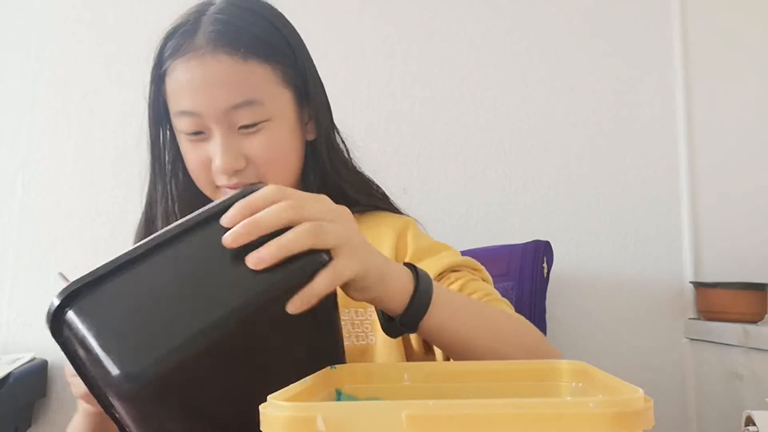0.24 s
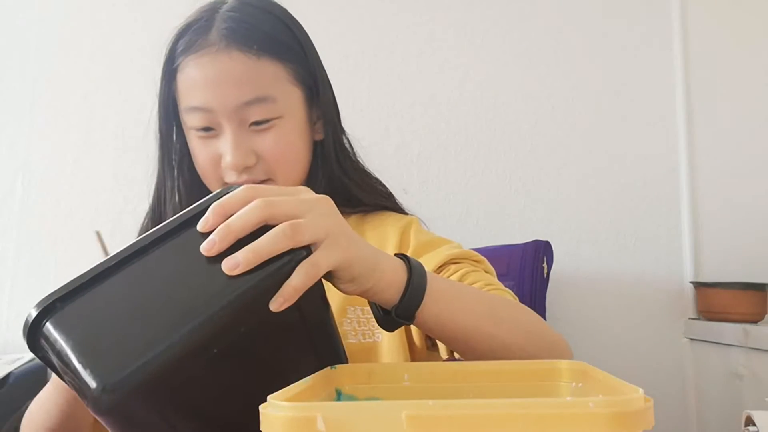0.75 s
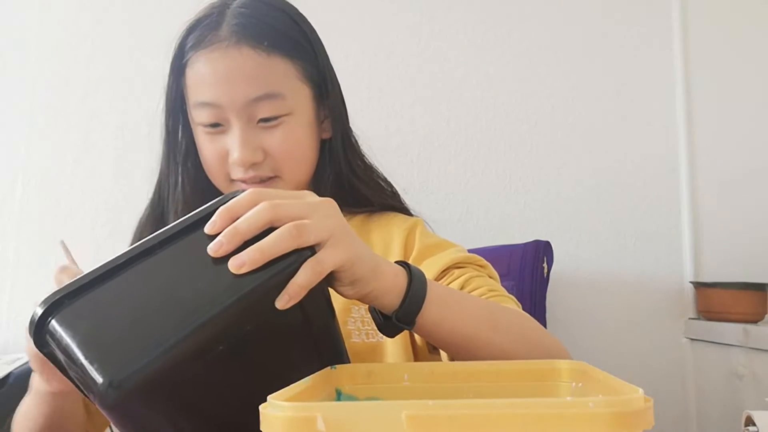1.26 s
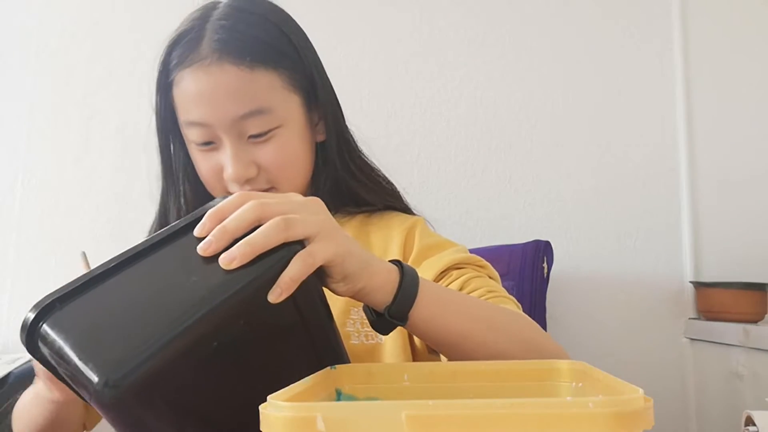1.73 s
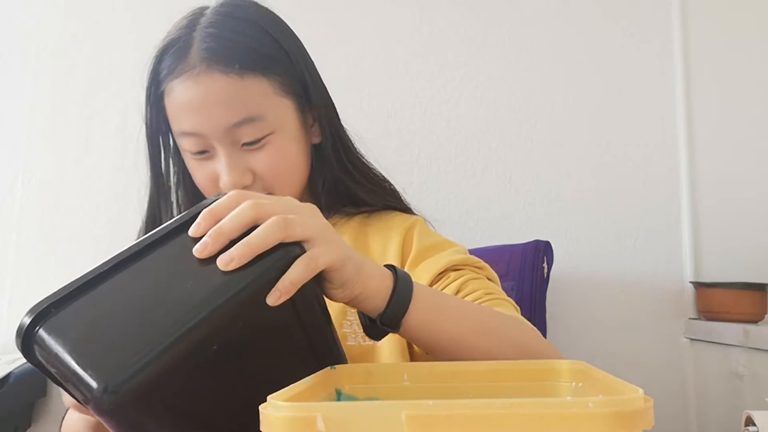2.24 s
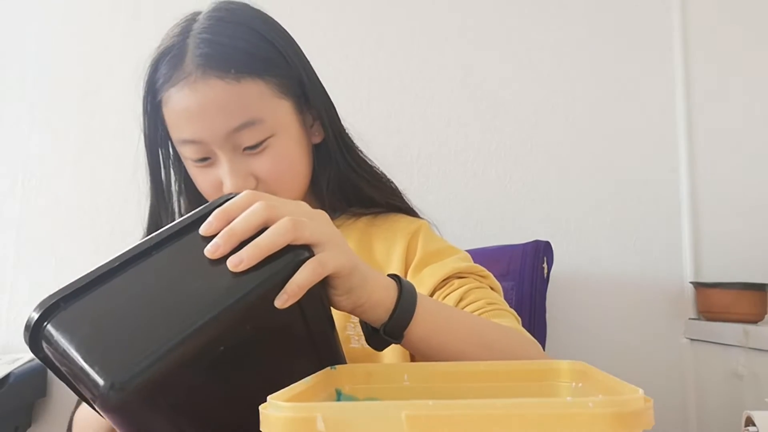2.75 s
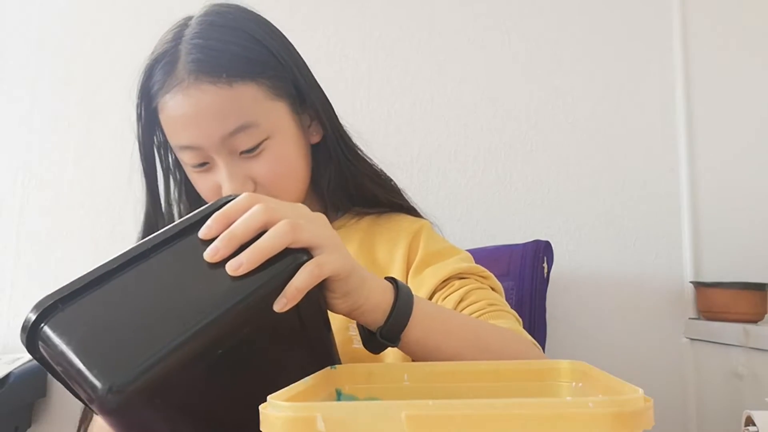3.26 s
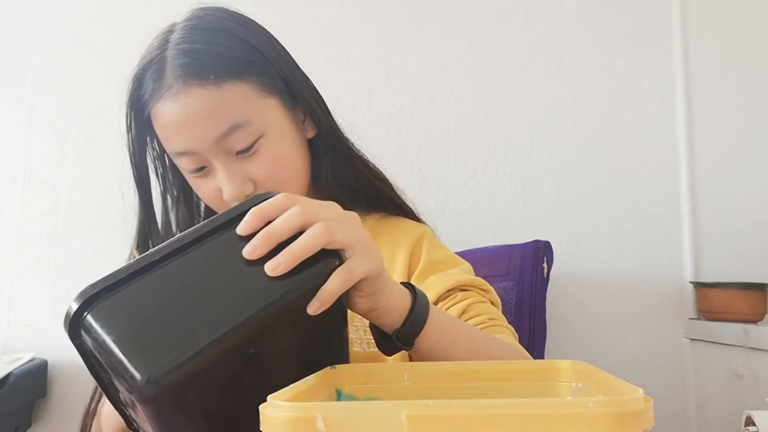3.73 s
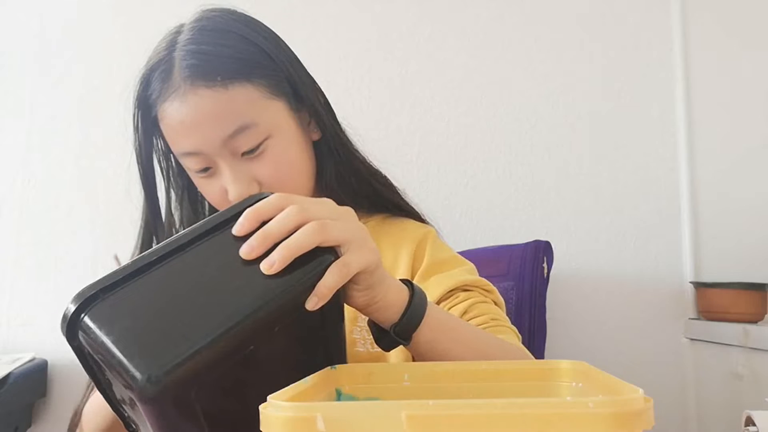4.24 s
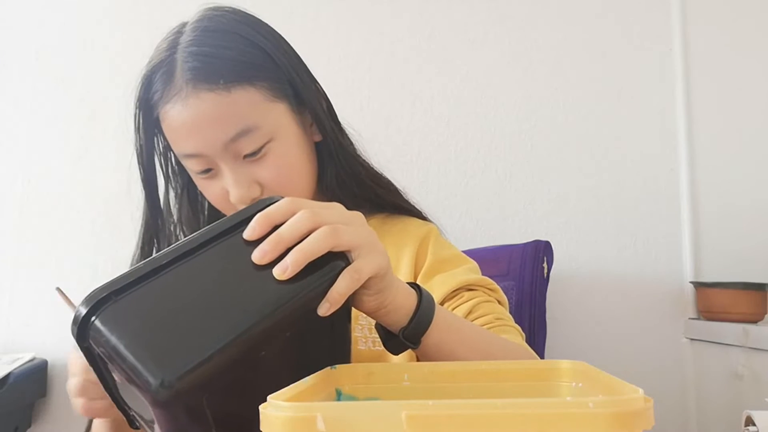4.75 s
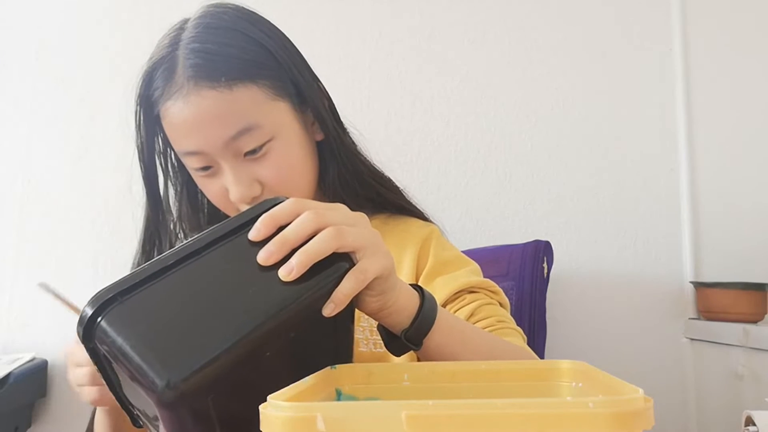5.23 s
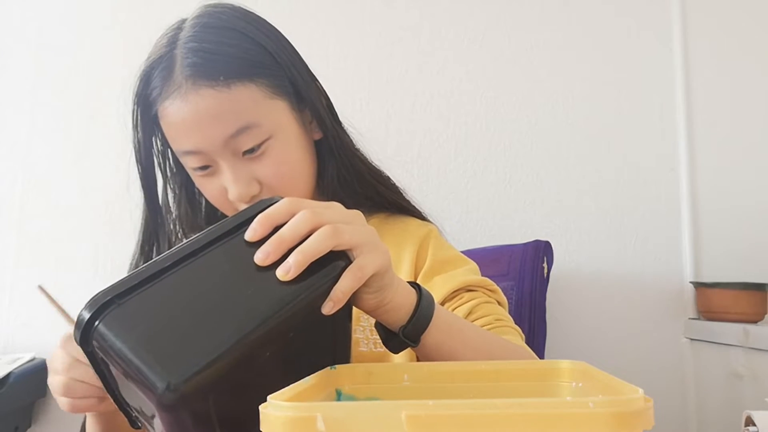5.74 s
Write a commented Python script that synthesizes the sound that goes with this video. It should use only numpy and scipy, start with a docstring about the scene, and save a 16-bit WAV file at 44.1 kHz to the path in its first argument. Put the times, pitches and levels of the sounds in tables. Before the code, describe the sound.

Dull, hollow stick taps on a tilted plastic container over a faint low hum, pausing midway, then returning as brisk, brighter, steady knocks.

```python
"""A low motor hum under faint hiss comes first, then a brush of cloth, then chopsticks working a thick mixture in a tub.
They knock the tilted plastic tub about three times a second, later faster and harder. Each knock sums fading tones
and noise set by its force, its hardness and where it lands; a small bare room answers with shaped, fading noise.
Between knocks come light grazes, a thin squeak made from a wavering sine, and sticky ticks made from noise bursts.
A phone close by picks it all up on two microphones."""
import sys
import numpy as np
from scipy import signal
from scipy.fft import rfft, irfft, next_fast_len
from scipy.io import wavfile
from scipy.ndimage import map_coordinates

SR = 44100
rng = np.random.default_rng(int(sys.argv[2]) if len(sys.argv) > 2 else 0)


def persist_wave(psi):
    """Save psi, clipped to +-1, as 16-bit WAV."""
    counts = np.round(np.clip(psi, -1, 1) * 32767).astype(np.int16)
    wavfile.write(sys.argv[1], SR, np.atleast_2d(counts).T)


N = 264203  # length in samples, about 6 s


def amp(db):
    """Turn decibels into a gain."""
    return 10 ** (np.asarray(db) / 20)


def unit(x):
    """Scale a sound to rms 1."""
    return x / np.sqrt(np.mean(x ** 2) + 1e-20)


def along(points, hz):
    """Read a curve of (pitch_hz, value) points at any frequency, on a log axis."""
    f, v = np.transpose(points)
    return np.interp(np.log(hz + 1), np.log(f + 1), v)


def wobble(rate):
    """A smooth random curve with `rate` random points a second."""
    points = rng.standard_normal(int(N * rate / SR) + 4)
    return map_coordinates(points, [np.arange(N) * rate / SR])


def filtered(x, response):
    """Change the tone of x with a gain for each frequency."""
    n = x.shape[-1]
    padded = next_fast_len(n + SR // 10)
    gain = response(np.fft.rfftfreq(padded, 1 / SR))
    return irfft(rfft(x, padded) * gain, padded)[..., :n]


def noise(spectrum, size):
    """Two unrelated coloured noises, together of rms 1."""
    white = rng.standard_normal((2, size))
    return unit(filtered(white, lambda hz: amp(along(spectrum, hz))))


def add(track, s, sound):
    """Mix a sound into the track at s seconds."""
    start = max(round(s * SR), 0)
    part = track[:, start:][:, :sound.shape[1]]
    part += sound[:, :part.shape[1]]


# how alike the two microphones hear sound from all around: pitch_hz, likeness (1 = the same, 0 = unrelated)
LIKENESS = [(50, 1), (200, 0.92), (500, 0.057), (1500, 0.12), (8000, 0.016)]


def diffuse(pair):
    """Sound from all around: long bass waves reach both microphones alike, shorter waves do not."""
    def mid_and_side(hz):
        turn = np.arccos(np.clip(along(LIKENESS, hz), -1, 1)) / 2
        return np.array([np.cos(turn), np.sin(turn)])
    mid, side = filtered(pair, mid_and_side)
    return np.array([mid + side, mid - side])


# colour of the room air, before its overall level is set: pitch_hz, relative_level_db
AIR_COLOUR = [(20, -20.5), (44, -17), (58, -18), (78, -23), (110, -26.5), (195, -24.5), (290, -35.5),
              (520, -39), (850, -44), (1300, -44), (1900, -38.5), (4000, -49.5), (5600, -50.5), (9000, -56),
              (15500, -59)]
# faint electrical lines: pitch_hz (the pitch wavers around it), rms_level_db
WHINE_LINES = [(5443, -101), (9803, -101)]
HUM_HZ, HUM_DB, HUM_WAVER_DB = 48.5, -52, 0.9  # centre pitch, peak level and its unsteadiness
AIR_DB = -64  # rms


def background():
    """A motor's slightly unsteady drone, room air and a faint electrical whine."""
    hum_level = amp(HUM_DB + HUM_WAVER_DB * wobble(4.8))
    hum_phase = 2 * np.pi * np.cumsum(HUM_HZ + 0.5 * wobble(10)) / SR
    hum = hum_level * np.sin(hum_phase)
    air = amp(AIR_DB + 0.32 * wobble(15)) * unit(diffuse(noise(AIR_COLOUR, size=N)))
    whine = 0
    for hz, db in WHINE_LINES:
        phase = 2 * np.pi * np.cumsum(hz + 18 * wobble(120)) / SR
        whine = whine + amp(db) * np.sqrt(2) * np.sin(phase)
    return hum + air + whine


# the tub brushes against clothing as it is tilted: centre_s, length_s, level_db
BRUSH_STROKES = [(0.092, 0.049, -66), (0.124, 0.026, -64), (0.275, 0.085, -71.5)]
# colour of the rustling cloth, also used for grazes: pitch_hz, relative_level_db
CLOTH_COLOUR = [(150, -22), (400, 3), (800, -2.5), (1600, 1), (3000, -5.5), (5000, -10), (7500, -9),
                (15000, -33)]


def brushes():
    """Short grainy swells of cloth on plastic: noise whose level flickers fast."""
    t = np.arange(N) / SR
    swell = 0
    for s, length, db in BRUSH_STROKES:
        swell = swell + amp(db) * np.exp(-(2 * (t - s) / length) ** 2)
    grain = amp(3.7 * wobble(288.4))
    return swell * unit(noise(CLOTH_COLOUR, size=N) * grain)


BLOW_S = 0.023


def as_blow(x):
    """Scale a sound to rms 1 over the length of a blow."""
    return x / np.sqrt(np.mean(x[:, :round(BLOW_S * SR)] ** 2))


def sides(pan_db):
    """Left and right gains; pan_db is left minus right."""
    return amp([[pan_db / 2], [-pan_db / 2]])


def ring(modes, rise, stretch=1, detune=0.032, scatter_db=5.0):
    """Fading tones of the tub at both microphones; the contact point shifts them a little from blow to blow."""
    t = np.arange(SR // 2) / SR
    out = np.zeros((2, len(t)))
    for hz, db, t60, lag in modes:
        pitch = hz * stretch * (1 + detune * rng.normal())
        phase = 2 * np.pi * pitch * t
        fade = amp(db + scatter_db * rng.normal() - 60 * t / t60)
        onset = 1 - np.exp(-t / rise)
        out += fade * onset * np.array([np.sin(phase), np.sin(phase - lag)])
    return as_blow(out)


def crack(spectrum, t60):
    """A burst of noise that dies away at once, losing 60 dB in t60 seconds."""
    t = np.arange(SR // 2) / SR
    return noise(spectrum, size=len(t)) * amp(-60 * t / t60)


# low resonances, alike at both microphones: pitch_hz, relative_level_db, t60_s (time to fade by 60 dB)
BOOM_MODES = [(62.2, -4, 0.2), (91.8, -2, 0.1), (112.6, -2.5, 0.13)]


def boom(swell=0.016):
    """The low resonances swell up after the blow, then fade; scaled to peak 1."""
    t = np.arange(SR // 2) / SR
    low = 0
    for hz, db, t60 in BOOM_MODES:
        low = low + amp(db - 60 * t / t60) * np.sin(2 * np.pi * (hz * t + rng.random()))
    low = low * (1 - np.exp(-(t / swell) ** 2))
    return low / np.abs(low).max()


# how long the room's answer takes to fade by 60 dB: pitch_hz, t60_s
ROOM_FADE = [(100, 0.17), (300, 0.28), (700, 0.3), (2000, 0.29), (6000, 0.31), (14000, 0.53)]


def room_tail(colour_db, gap=0.0029, build=0.012):
    """Echoes of a short sound merge into fading noise of its colour, starting once the first wall is reached."""
    field = diffuse(rng.standard_normal((2, SR // 2)))
    hz, t, z = signal.stft(field, SR, nperseg=1024)
    fade_db = -60 * t / along(ROOM_FADE, hz)[:, None]
    tail = signal.istft(z * amp(colour_db(hz)[:, None] + fade_db), SR, nperseg=1024)[1]
    age = np.maximum(np.arange(SR // 2) / SR - gap, 0)
    return tail[:, :len(age)] * (1 - np.exp(-age / build))


# how boom, body, wall, rim, clack and tick (one row each) answer a knock, before the mix in knocks():
# level_at_medium_force_db, db_per_db_of_force, db_per_db_of_hardness, db_per_db_of_give
FAMILY_RESPONSE = [(-52.5, 0.94, 0.53, 1.54), (-48.5, 0.8344, -0.38, -0.33), (-48, 1.22, -0.43, 1.38),
                   (-50.5, 1.2851, -0.1, -0.11), (-55.5, 1.0449, 1.0353, -0.13), (-75.5, 0.57, 1.44, 0.49)]
MEDIUM_DB = -50  # medium force


def family_levels(force, hardness, give):
    """Levels in dB of the six families: a hard tip brightens a knock, a yielding panel deepens it."""
    medium, per_force, per_hardness, per_give = np.transpose(FAMILY_RESPONSE)
    return medium + per_force * (force - MEDIUM_DB) + per_hardness * hardness + per_give * give


# chopstick knocks: landing_s, force_db, hardness_db (bare tip + or cushioned by the mixture -),
# give_db (middle of a panel + or near a stiff edge -), wall_pitch_hz, rim_pitch_hz
STICK_KNOCKS = [(0.129, -65, -2, 7.5, 715, 1430), (0.688, -54, -7.5, -0.5, 707, 1350),
                (1.004, -49, -4, 0.5, 698, 1390), (1.378, -47.5, 2.5, -3.5, 646, 1505),
                (1.726, -46, 6, -2.5, 637, 1440), (2.132, -64.5, -2.5, 5.5, 712, 1420),
                (2.335, -51.5, -4.5, 0.5, 722, 1440), (2.543, -45, -1.5, 4, 737, 1475),
                (2.727, -48, -2, 4.5, 706, 1420), (3.104, -57, -7, -0.5, 840, 1400),
                (3.453, -50, -2.5, 4, 735, 1440), (4.38, -56, -2.5, 2, 683, 1210),
                (4.607, -62, -2.5, 7, 823, 1430), (4.636, -62, -1.5, 1.5, 716, 1140),
                (4.8373, -46, 0.5, -2.5, 597, 1290), (5.0527, -47.5, 0.8, 0, 587, 1326),
                (5.252, -41, 4.5, -3, 640, 1393), (5.441, -40.5, 6.3, -2, 696, 1390),
                (5.631, -41, 2, -3.5, 676, 1280), (5.832, -44, 1.7, -2.5, 640, 1380)]
# tones of the tub, from low to high, before each blow shifts them:
# pitch_hz, relative_level_db, t60_s (time to fade by 60 dB), right_microphone_lag_rad
BODY_MODES = [(199, -3.5, 0.052, 0.28), (233.9, -8, 0.096, 0.31), (336.7, 1.5, 0.03, 0.068),
              (501, -10, 0.039, 0.98)]
WALL_MODES = [(595, -4.5, 0.029, 0.8), (703, 9.5, 0.024, 2.6), (797, -11, 0.049, 1.2)]
RIM_MODES = [(1049, 1, 0.02, 0.3), (1206, -1, 0.015, 0), (1406, 17.5, 0.0099, 0.13)]
CLACK_MODES = [(1728, 11.5, 0.0056, 0.31), (1955, 4, 0.0047, 2.2), (2400, -1.5, 0.016, 1.61),
               (3010, -10.5, 0.0085, 2), (3370, -20, 0.031, 2)]
# colour of the contact noise: pitch_hz, relative_level_db
TICK_COLOUR = [(2000, -18), (3400, -32), (4700, 20.5), (6500, 25), (8500, 14), (12000, 4), (16000, -48)]
# colour of the room's answer to a blow: pitch_hz, relative_level_db
ROOM_COLOUR = [(60, 5), (105, 24), (150, 18.5), (235, 19.5), (450, 10), (640, 14.5), (950, 2.5),
               (1330, 13.5), (1600, 7.5), (2550, 10), (3900, 3), (6500, 2.5), (9000, -8), (15000, -15)]
# centres of boom, body, wall, rim, clack and tick: pitch_hz
FAMILY_CENTRES = [100, 270, 680, 1250, 2400, 6000]
PAN_DB = 6.5  # the tub lies to the left: left minus right for the edge sounds
CLACK_RISE_S, TICK_T60_S = 0.0006, 0.008


def knocks(boom_db=7, body_db=0, wall_db=-1, rim_db=-1, clack_db=-1, tick_db=-1.0, room_db=0,
           spread=0.4, sharpen=0.13, second_db=-12, skid_db=-29, echo_s=0.0145, echo_db=-16):
    """The stiff rim speaks at once; the wide panels, loaded by the shifting mixture, take milliseconds to swing."""
    track = np.zeros((2, N))
    for s, force, hardness, give, wall_hz, rim_hz in STICK_KNOCKS:
        levels = family_levels(force, hardness, give)
        low, body, wall, rim, clack, tick = levels
        # move the main wall and rim tones to this knock's pitches
        wall_stretch = wall_hz / WALL_MODES[1][0]
        rim_stretch = rim_hz / RIM_MODES[2][0]
        # the harder the contact, the higher the clack
        clack_stretch = amp(sharpen * max(clack - rim, 0))

        panels = amp(body + body_db) * ring(BODY_MODES, rise=0.0042) * sides(0.055 * PAN_DB)
        wall_ring = ring(WALL_MODES, rise=0.0026, stretch=wall_stretch)
        panels += amp(wall + wall_db) * wall_ring * sides(1.11 * PAN_DB)
        edge = amp(rim + rim_db) * ring(RIM_MODES, rise=0.00085, stretch=rim_stretch)
        edge += amp(clack + clack_db) * ring(CLACK_MODES, rise=CLACK_RISE_S, stretch=clack_stretch)
        edge += amp(tick + tick_db) * as_blow(crack(TICK_COLOUR, t60=TICK_T60_S))
        add(track, s, panels + edge * sides(PAN_DB) + amp(low + boom_db) * boom())

        # the tip skids over the plastic just before it lands
        add(track, s - rng.uniform(0.0017, 0.00404), amp(skid_db) * edge)
        # the second stick follows a moment after the first
        add(track, s + rng.uniform(0.002085, 0.00512), amp(second_db) * edge * sides(PAN_DB))
        # the nearest wall of the room sends back a copy
        add(track, s + echo_s, amp(echo_db) * (panels + edge))
        # the room gathers sound from all sides of the tub, so its colour varies less than that of the blow
        evened = (1 - spread) * levels + spread * np.mean(levels)
        colour = list(zip(FAMILY_CENTRES, evened))
        tail = room_tail(lambda hz: along(colour, hz) + along(ROOM_COLOUR, hz))
        add(track, s, amp(room_db) * tail)
    return track


# lightly damped tones that outlast the blow:
# pitch_hz, relative_level_db, t60_s (time to fade by 60 dB), right_microphone_lag_rad
LINGER_MODES = [(343, -12.5, 0.33, 0.42), (591, -5, 0.2, 1.3), (660, 3.5, 0.37, 3.06), (710, -10, .25, 4.3),
                (722, -8.5, 0.16, 2.7), (1304, -9, 0.2, 0.9), (1363, -5, 0.23, 0.14),
                (1440, -6, 0.17, 0.45), (1830, -7.5, 0.23, 0.9)]


def lingering(linger_db=-12.0):
    """With each knock the tub also sings on faintly, because some of its tones lose energy slowly."""
    track = np.zeros((2, N))
    for s, force, hardness, give, _, _ in STICK_KNOCKS:
        _, _, wall, rim, _, _ = family_levels(force, hardness, give)
        song = ring(LINGER_MODES, rise=0.0076, detune=0.0049)
        add(track, s, amp((wall + rim) / 2 + linger_db) * song)
    return track


# glancing touches that ring only the wall and the rim: start_s, wall_level_db, rim_level_db
GLANCING_TOUCHES = [(.407, -69, -75), (1.846, -59.5, -67.5), (2.703, -80, -67), (3.676, -64, -78.5),
                    (4.266, -71.5, -84)]


def grazes(room_db=-4):
    """A stick skims the tub on its way through the mixture, ringing its wall and rim lightly."""
    track = np.zeros((2, N))
    for s, wall, rim in GLANCING_TOUCHES:
        wall_ring = amp(wall) * ring(WALL_MODES, rise=0.0014)
        rim_ring = amp(rim) * ring(RIM_MODES, rise=0.007)
        add(track, s, wall_ring + rim_ring)
        tail = room_tail(lambda hz: along(ROOM_COLOUR, hz) + along(CLOTH_COLOUR, hz))
        add(track, s, amp(rim + room_db) * tail)
    return track


SQUEAK_S, SQUEAK_SWELL_S, SQUEAK_FADE_S = 3.16, 0.14, 0.08  # start, rise and fall
SQUEAK_DB = -70.5  # level at the top of the swell, about which it flutters
SQUEAK_HZ, SAG_HZ_PER_S, FLUTTER_HZ = 2495, 500, 29  # starting pitch, its fall, regular pulsing


def squeak(flutter_db=3, pulse_db=4):
    """A thin, fluttering squeak, a wavering sine that swells, sinks in pitch and fades."""
    age = np.arange(N) / SR - SQUEAK_S
    corners = [0, SQUEAK_SWELL_S, SQUEAK_SWELL_S + SQUEAK_FADE_S]
    swell = np.interp(age, corners, [0, 1, 0]) ** 0.35
    hz = SQUEAK_HZ - SAG_HZ_PER_S * age
    phase = 2 * np.pi * np.cumsum(hz * (1 + 0.0055 * wobble(150))) / SR
    pulse = pulse_db * np.sin(2 * np.pi * FLUTTER_HZ * age)
    flutter = flutter_db * np.array([wobble(70), wobble(70)])
    return swell * amp(SQUEAK_DB + pulse + flutter) * np.sin(phase)


# wet ticks of the mixture, before the snap and room trims: start_s, relative_level_db
STICKY_TICKS = [(5.917, -47), (5.929, -49.5)]
# colour of a snap: pitch_hz, relative_level_db
SNAP_COLOUR = [(2000, -19), (5000, -6), (7500, -1), (9500, -3), (11800, 5.5), (15500, -12)]


def sticky(snap_db=-6, room_db=-20):
    """The mixture lets go of the sticks with tiny bright snaps of noise."""
    track = np.zeros((2, N))
    for s, db in STICKY_TICKS:
        snap = amp(db + snap_db) * crack(SNAP_COLOUR, t60=0.016)
        tail = amp(db + room_db) * room_tail(lambda hz: along(SNAP_COLOUR, hz))
        add(track, s, snap + tail)
    return track


def scene():
    """Stirring in front of the room's steady background."""
    return background() + brushes() + knocks() + lingering() + grazes() + squeak() + sticky()


TOP_HZ = 15600


def record(dry):
    """The phone keeps nothing above its band limit."""
    return filtered(dry, lambda hz: hz < TOP_HZ)


dry = scene()
out = record(dry)
persist_wave(out)
```